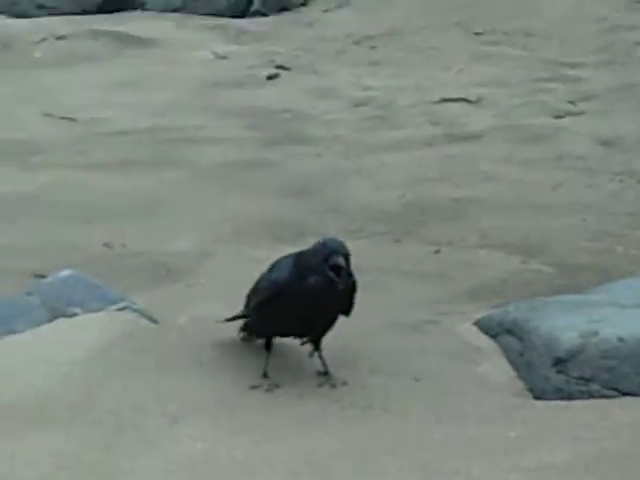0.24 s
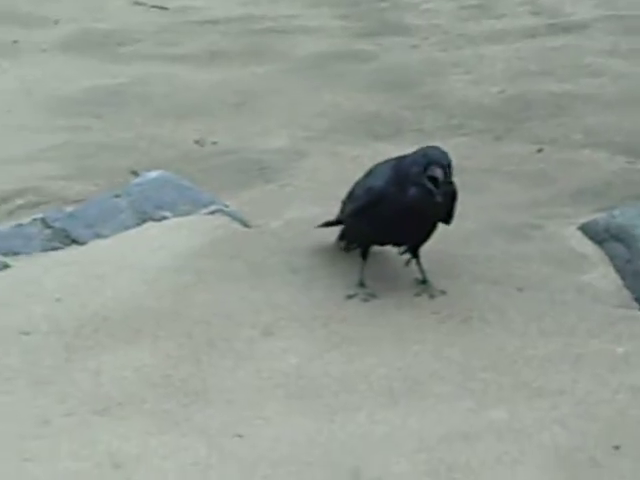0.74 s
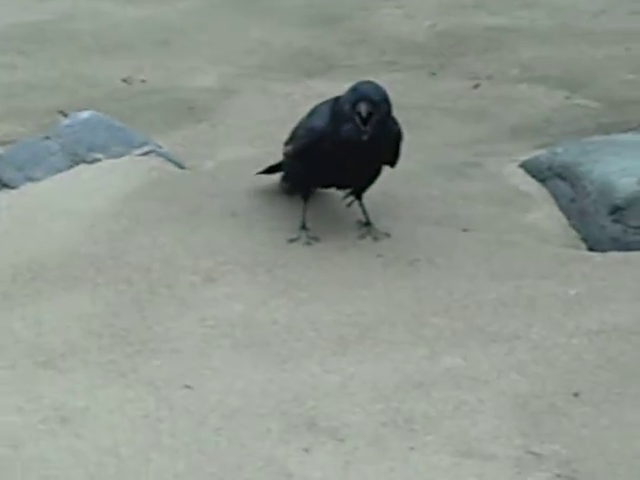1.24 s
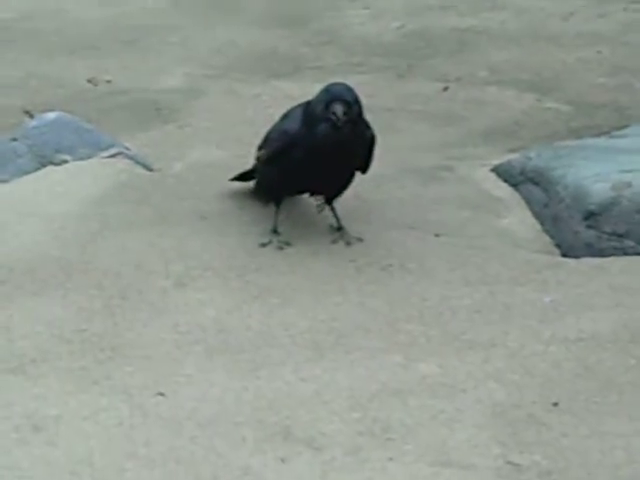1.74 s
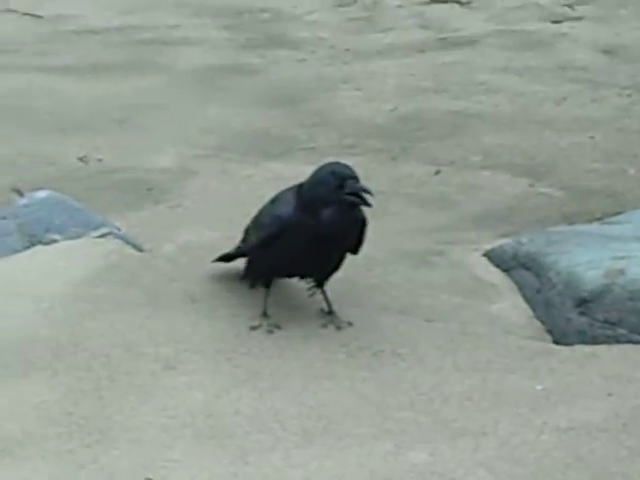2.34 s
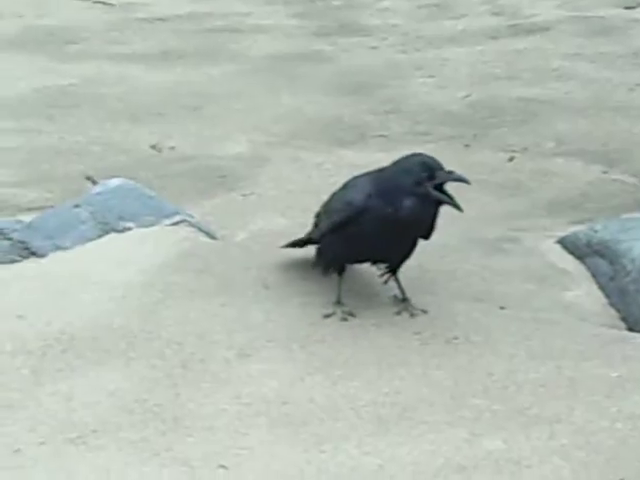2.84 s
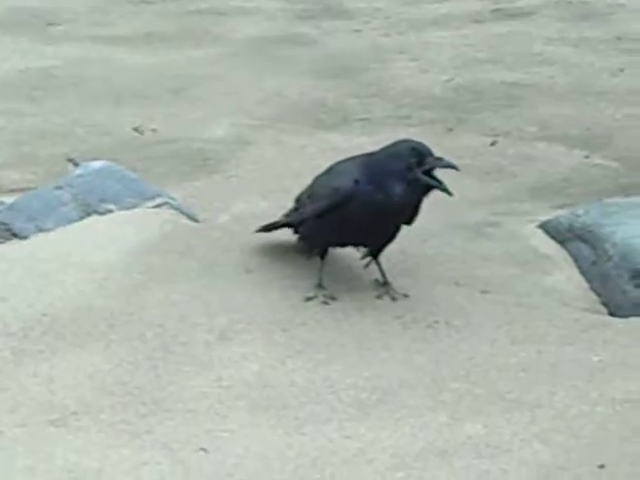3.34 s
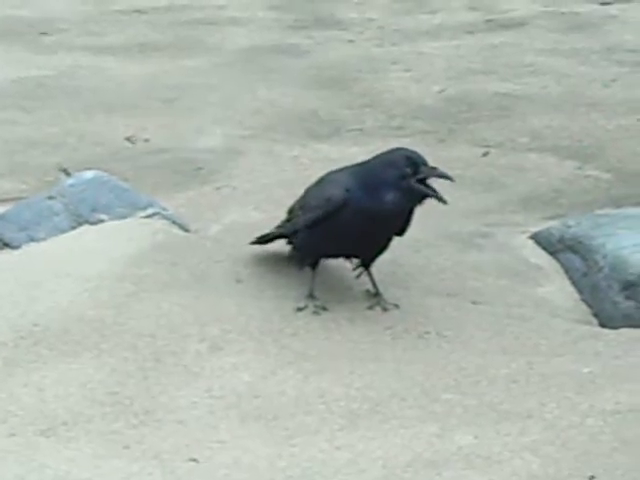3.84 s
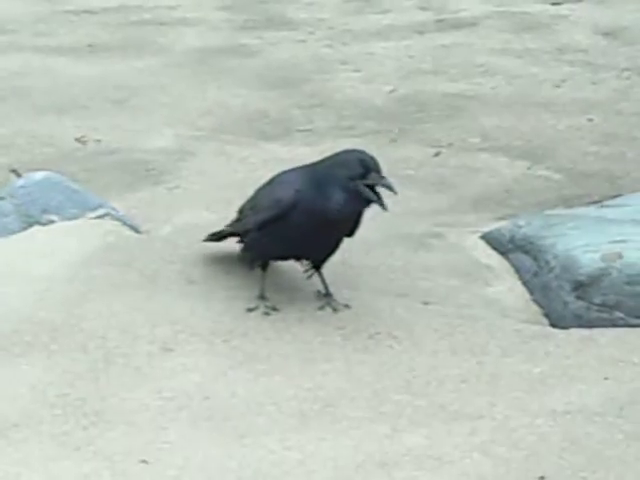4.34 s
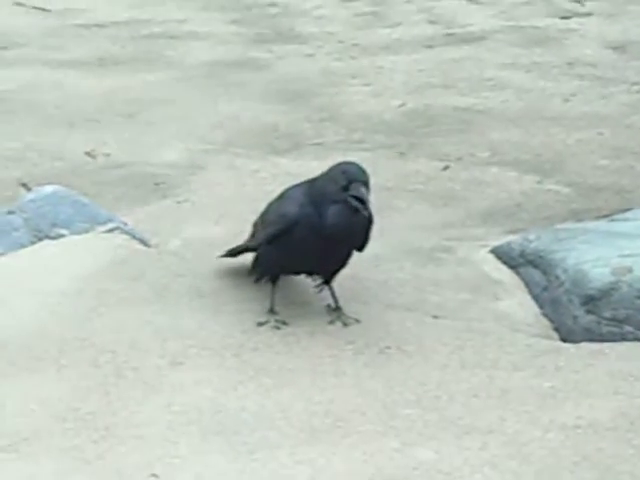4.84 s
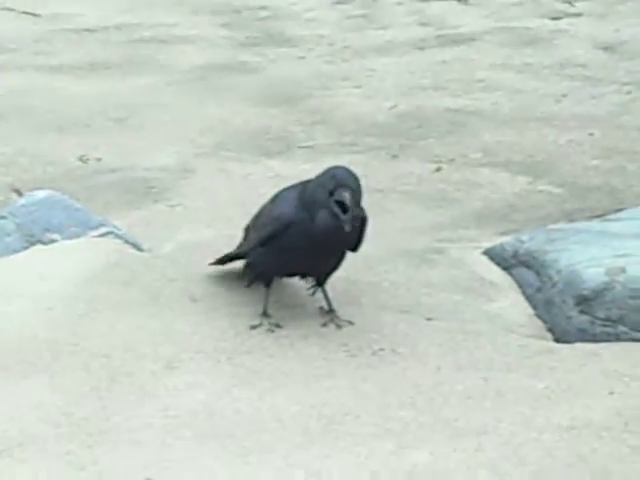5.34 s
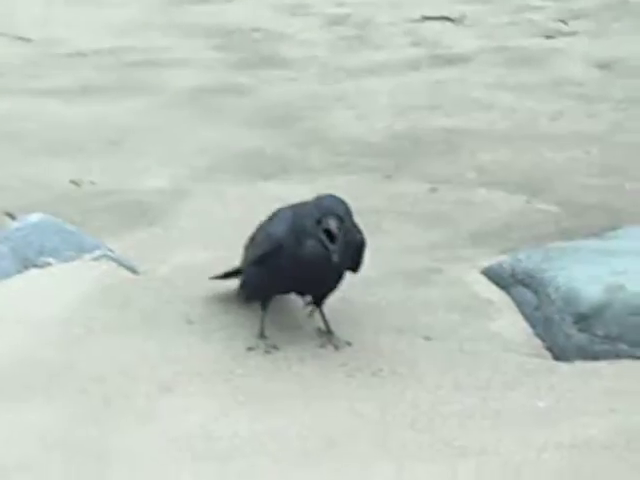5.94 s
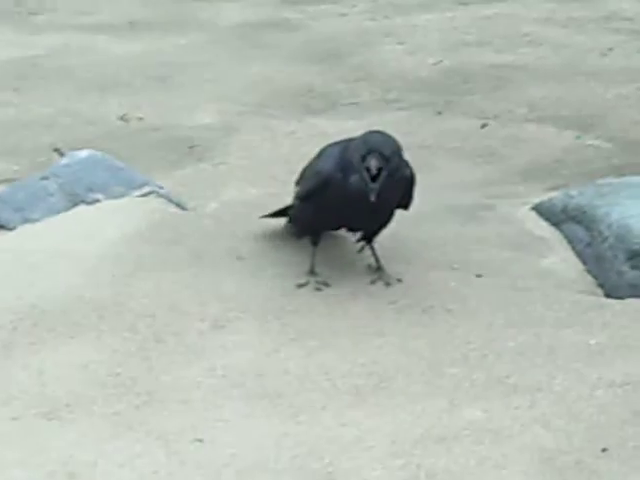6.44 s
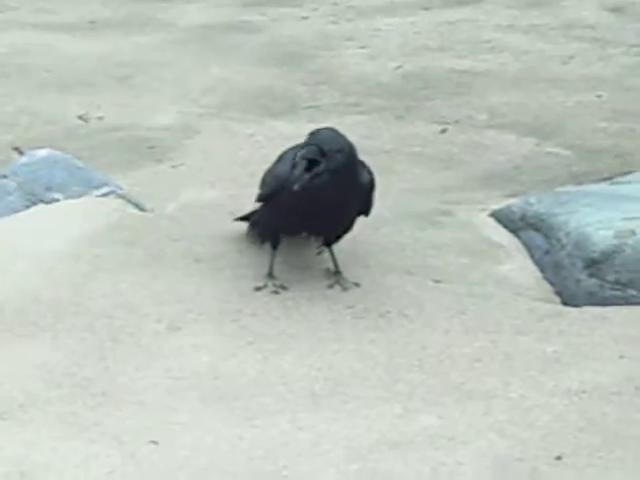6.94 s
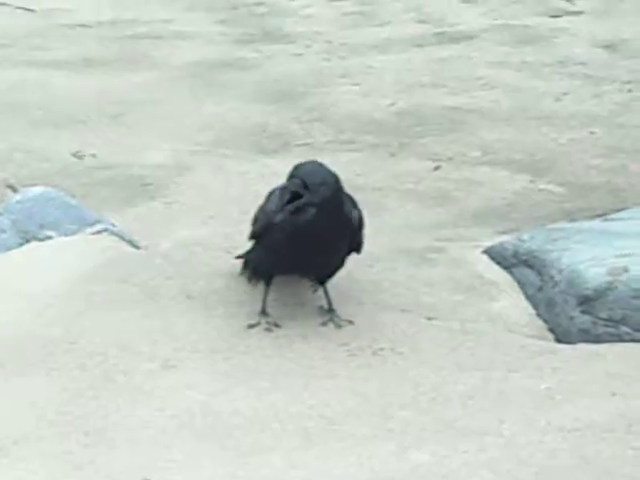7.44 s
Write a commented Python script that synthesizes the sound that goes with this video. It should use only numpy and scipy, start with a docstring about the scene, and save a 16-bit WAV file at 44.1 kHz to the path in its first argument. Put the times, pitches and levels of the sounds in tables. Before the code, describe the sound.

Sixteen hoarse, rattling raven caws, about two a second, ring out over a constant beach wash with low wind thumps on the microphone.

```python
"""A raven on a sandy beach caws sixteen times, close by, over the steady wash of surf.
Each caw opens with a hoarse rasp of noise and breaks into a rattle: about sixty bursts a second of
overtones of a pitch near 500 Hz, ringing in the resonances of throat and beak.
The surf is shaped noise; gusts swell a low rumble, a buffet and a crackle at the microphone.
A narrow-band recorder clips the loudest peaks."""
import sys
import numpy as np
from scipy import signal
from scipy.fft import rfft, irfft, next_fast_len
from scipy.io import wavfile

SR = 44100
rng = np.random.default_rng(int(sys.argv[2]) if len(sys.argv) > 2 else 0)


def log_audio(samples):
    """Write samples as a 16-bit WAV file to the path given in sys.argv[1]."""
    # one column per channel
    frames = np.atleast_2d(samples).T
    # limit to full scale, then quantise
    limited = np.clip(frames, -1, 1)
    pcm = np.round(limited * 32767).astype(np.int16)
    wavfile.write(sys.argv[1], SR, pcm)


N = 338247
TIME = np.arange(N) / SR  # s

# Runs of rattle, one to a caw, though the two hoarsest caws break into several.
# Each row: first burst in seconds, last burst in seconds, number of bursts, slowing 0-1, effort in dB,
# extra effort of the first burst in dB, of the last burst in dB, top pitch in Hz, end pitch in Hz,
# roughness 0-1, nominal open share of the period 0-1, second resonance in dB, upper resonances in dB,
# length of the rasp before it in seconds, relative rasp level in dB.
RATTLE_RUNS = [ (.003, 0.077, 5, .09, 0, -0.5, -5, 528, 465, 0.22, 0.62, 1, -2, 0.018, -6),
               (0.353, .399, 4, 0.02, -2, 0, -1, 490, 480, 0.94, 0.3, -1.5, -1.5, 0.1, -15.5),
               (.431, .528, 6, 0.09, -2, 1, -5, 486.3, 469.3, .72, .28, -4, -0.5, .03, -24),
               (.871, 1.023, 10, .15, -1.5, -4, 0, 508, 469.8, 0.32, .58, -0.5, -1.5, 0.088, -10.5),
               (1.351, 1.474, 8, 0.26, -.5, -3.5, -3, 535.4, 455.5, .08, 0.67, 1, .5, 0.083, -12),
               (1.921, 2.102, 12, 0.2, -1.5, -3, -3, 513, 449.5, 0.3, 0.51, -1.5, -0.5, 0.045, -9),
               (2.498, 2.617, 9, 0.19, -1, -4, -3.5, 520, 490.5, 0.33, 0.71, -1, -2.5, .085, -8.5),
               (2.921, 3.055, 9, 0.11, -1, -5, -7, 512.3, 462.6, 0.18, .62, 0.5, -0.5, 0.088, -7),
               (3.298, 3.314, 2, 0.05, -2, 0, -1, 488, 475, .6, .34, -3.5, -3.5, 0.051, -12),
               (3.342, 3.419, 6, 0.12, -1, -1, -0.5, 487, 470, 0.66, 0.13, -4.5, -1.5, 0.024, -13),
               (3.453, 3.482, 3, 0.06, -3, -2, 0.5, 479, 462, .7, .28, -3.5, -2.5, 0.031, -14.5),
               (3.88, 4.025, 9, 0.1, -3, 2, -3, 498, 467.9, 0.31, 0.62, -2, -2.5, 0.06, -8),
               (4.429, 4.568, 9, .18, -1, -5, -4.5, 513, 438.4, 0.18, 0.59, 0, 0.5, 0.064, -15),
               (5.017, 5.2, 12, .16, -.5, -4, -6, 518.2, 440.2, .08, .6, 0, 2, 0.061, -12),
               (5.543, 5.666, 9, .1, -.5, -2.5, 0, 558, 512, 0.21, 0.66, 1, -1, 0.054, -11.5),
               (5.990, 6.153, 11, .11, -2, -2, -3, 500, 438.8, .45, .48, 0.5, 2, 0.072, -9),
               (6.429, 6.550, 8, .11, -1.5, -4, 0, 499.6, 420, .12, .6, 1.5, 3.5, 0.073, -9),
               (6.841, 6.998, 10, 0.16, -1.5, -2.5, -1.5, 526, 450, 0.31, 0.56, -0.5, -2.5, 0.054, -13.5),
               (7.459, 7.538, 6, .12, -2, -0.5, 0, 506, 431, 0.33, 0.62, 1.5, -3, 0.084, -7)]
# Lone throat clicks ahead of a run. Each row: start in seconds, relative level in dB.
THROAT_CLICKS = [(0.285, -5), (0.859, -5), (1.286, -8), (2.411, -4.5), (3.250, -16), (3.270, -12),
                 (4.361, -3), (4.373, -13), (4.946, -14), (5.945, -4), (6.356, -17)]
# Resonances of throat and open beak. Each row: centre in Hz, width in Hz, level in dB.
THROAT_RESONANCES = [(1408, 260, 4), (1930, 382, -0.5), (2930, 610, -4.5), (4045, 66, -1)]
# Overtones of the syrinx. Each row: multiple of the pitch, level in dB.
SYRINX_OVERTONES = [(3, 1), (4, 4.5), (5, 1), (6, -2), (7, -2.5), (8, 2.5)]
# Spectrum of the surf. Each row: frequency in Hz, relative density in dB.
SURF_SPECTRUM = [(15, -54), (25, -33.5), (65, -16.5), (103, -8.5), (178, -2), (216, -2), (374, 0.5),
                 (471, 0.5), (513, -1), (870, -0.5), (2610, -5.5), (3580, -4.5), (3900, -3.5), (5070, -28),
                 (8580, -120)]
# Slow swell of the surf. Each row: time in seconds, relative level in dB.
SURF_SWELL = [(0.0, -28.5), (0.13, -27), (1.39, -25), (2.22, -26.5), (2.43, -27), (3.16, -28.5),
              (3.44, -25.5), (3.54, -29), (4.14, -29.5), (4.91, -28), (5.11, -27), (6.81, -26.5),
              (6.94, -26.5), (7.28, -28), (7.67, -25)]
# Spectrum of the low wind rumble. Each row: frequency in Hz, relative density in dB.
RUMBLE_SPECTRUM = [(12, -4), (34, -1), (70, -5), (140, -9), (300, -19.5), (700, -58), (2000, -91)]
# Spectrum of the wind buffets. Each row: frequency in Hz, relative density in dB.
BUFFET_SPECTRUM = [(20, -8), (90, -7), (240, 2.5), (400, -3.5), (750, -11), (1300, -32), (3000, -73)]
# Spectrum of the crackle in hard buffets. Each row: frequency in Hz, relative density in dB.
CRACKLE_SPECTRUM = [(150, -30), (450, 12), (900, -12.5), (1400, -25), (3000, -37)]
# Gusts at the microphone. Each row: centre in seconds, Gaussian spread in seconds,
# low rumble in dB, buffet in dB.
WIND_GUSTS = [(0.05, 0.022, -22, -20.5), (0.467, 0.04, -38, -45), (1.58, 0.042, -26.5, -23.5),
              (1.635, .007, -25.5, -15.5), (1.681, 0.023, -19.5, -17.5), (1.771, 0.0047, -16, -12),
              (1.843, 0.0084, -25.5, -14), (1.984, 0.0097, -19.5, -25), (2.126, .0045, -22.5, -22),
              (2.173, .013, -20, -25), (2.88, 0.035, -27, -38), (4.12, 0.019, -26, -34),
              (4.533, 0.017, -20.5, -20), (4.589, 0.0048, -32, -16.5), (4.615, 0.014, -19, -15),
              (5.058, 0.016, -23, -21.5), (5.626, 0.013, -25, -32), (6.06, .035, -21, -30),
              (6.419, 0.051, -27, -34), (6.94, 0.029, -22, -22.5), (7.036, .022, -11.5, -14.5),
              (7.095, 0.015, -21, -13), (7.496, 0.016, -10, -15.5), (7.66, .015, -23.5, -38)]

# Steady breeze and chance wander; a gust's rumble spreads wider than its buffet
BREEZE_DB, BREEZE_WAVER_DB, SURF_WAVER_DB, LINGER_S = -36.5, 3.5, .7, .024
# A run starts near the resting pitch, drawn this share of the way to its top
REST_HZ, START_SHARE = 475, .38
# Effort settles from that of the first burst with this time constant
BUILD_S = .016
# Time constants of the opening and closing of a burst
OPENING_S, CLOSING_S = .0007, .0008
# A rough burst may break in two: chance factor at full roughness, spread of the break
SPLIT_CHANCE, SPLIT_S = .8, .0012
# The rasp swells up to the rattle; its leak holds past the last burst, then dies away
RASP_SWELL_DB, RASP_HOLD_S, RELEASE_DB_PER_S = 13.5, .012, 546
# The rasp peaks just ahead of the rattle and catches as the syrinx tightens
CATCH_S, CATCH_DB = .0099, 5
# Sample rate of the narrow-band recorder, and edge of the final low-pass
RECORDER_HZ, CUTOFF_HZ = 8000, 16000


def from_db(db):
    """Level to amplitude: every 20 dB is a factor of ten."""
    return 10 ** (np.asarray(db) / 20)


def rms_one(x):
    """Normalization: scale to unit mean power."""
    return x / np.sqrt(np.mean(x ** 2) + 1e-20)


def in_time(rows):
    """Linear interpolation: join the points of a curve by straight lines."""
    s, value = np.transpose(rows)
    return np.interp(TIME, s, value)


def bump(s, length):
    """Gaussian envelope: a smooth rise and fall around a moment."""
    squared_distance = ((TIME - s) / length) ** 2
    return np.exp(-.5 * np.minimum(squared_distance, 100))


def coloured_noise(spectrum):
    """Spectral shaping: white noise weighted over log frequency, then set to unit power."""
    hz, db = np.transpose(spectrum)
    size = next_fast_len(N)
    bins = np.maximum(np.arange(size // 2 + 1) * SR / size, 1)
    gain = from_db(np.interp(np.log(bins), np.log(hz), db))
    white = rfft(rng.standard_normal(size))
    return rms_one(irfft(white * gain, size)[:N])


def drift(rate_hz):
    """Low-passed noise: a smooth random wander of unit spread."""
    lowpass = signal.butter(2, rate_hz, fs=SR, output="sos")
    return rms_one(signal.sosfilt(lowpass, rng.standard_normal(N)))


def surf(level_db=2.5):
    """Broadband noise of many breakers: distant waves blend into an even, slowly swelling wash."""
    level = in_time(SURF_SWELL) + level_db + SURF_WAVER_DB * drift(2.3)
    return from_db(level) * coloured_noise(SURF_SPECTRUM)


def wind(lumpy_db=1.0, splutter_db=2.5, crackle_db=2.5):
    """Turbulent pressure: gusts add power to a lumpy rumble; buffets reach higher, the hardest crackle."""
    breeze = from_db(BREEZE_DB + BREEZE_WAVER_DB * drift(3.1))
    gust_power = sum((from_db(db) * bump(s, length + LINGER_S)) ** 2 for s, length, db, _ in WIND_GUSTS)
    rumble_level = np.sqrt(breeze ** 2 + gust_power) * from_db(lumpy_db * drift(26))
    rumble = rumble_level * coloured_noise(RUMBLE_SPECTRUM)

    buffets = sum(from_db(db) * bump(s, length) for s, length, _, db in WIND_GUSTS)
    buffets = buffets * from_db(splutter_db * drift(70))
    # small eddies grow with the square of the buffet
    crackle = from_db(crackle_db) * buffets ** 2 * coloured_noise(CRACKLE_SPECTRUM)
    return rumble + buffets * coloured_noise(BUFFET_SPECTRUM) + crackle


def beach(x, scatter_db=-19.5, t60=0.012):
    """Diffuse scattering: sand and rocks return a faint, short, decaying tail."""
    age = np.arange(SR // 6) / SR
    # the first return comes after 4 ms
    tail = rng.standard_normal(len(age)) * from_db(-60 * age / t60) * (age > .004)
    scattered = signal.fftconvolve(x, tail / np.linalg.norm(tail))[:N]
    return x + from_db(scatter_db) * scattered


def throat(x, gains=(1, 1, 1, 1)):
    """Resonance: parallel two-pole modes of alternating sign in a throat and beak that radiate no bass."""
    out = 0
    for k, ((hz, width, db), gain) in enumerate(zip(THROAT_RESONANCES, gains)):
        r = np.exp(-np.pi * width / SR)
        poles = [1, -2 * r * np.cos(2 * np.pi * hz / SR), r * r]
        ring = signal.lfilter([1, 0, -1], poles, x) * (1 - r * r) / 2
        out = out + (-1) ** k * from_db(db) * gain * ring
    highpass = signal.butter(4, 1150, "high", fs=SR, output="sos")
    return signal.sosfilt(highpass, out)


def through_throat(source, envelope, gains=(1, 1, 1, 1)):
    """Source and filter: a steady source, levelled by its power at the beak, is gated and then rings."""
    return throat(source * envelope, gains) / np.std(throat(source))


def rasp(level_db=-5.0, between_db=-19.0, flutter_db=1.23, second_db=-4.0, flap_hz=80.8, flap_db=3.0):
    """Flow modulation: loose membranes flap unevenly in a swelling airflow; a leak lasts through the rattle."""
    lead, leak = np.zeros((2, N))
    for first, last, *_, rasp_s, rasp_db in RATTLE_RUNS:
        before = (TIME > first - rasp_s) & (TIME <= first)
        ahead = first - TIME[before]
        catch_db = CATCH_DB * np.maximum(1 - ahead / CATCH_S, 0)
        lead[before] = from_db(rasp_db - RASP_SWELL_DB * (ahead / rasp_s) ** 2 - catch_db)

        during = (TIME > first) & (TIME < last + .1)
        dying_s = np.maximum(TIME[during] - last - RASP_HOLD_S, 0)
        leak[during] = from_db(between_db - RELEASE_DB_PER_S * dying_s)
    # each flap starts sharply and fades until the next
    cycle = np.cumsum(flap_hz * (1 + 0.37 * drift(50))) / SR % 1
    flapping_lead = lead * from_db(level_db + flap_db * (.5 - cycle))
    envelope = np.maximum(flapping_lead, leak) * from_db(flutter_db * drift(140))
    # one-pole smoothing darkens the airflow noise
    air = signal.lfilter([1], [1, -.6], rng.standard_normal(N))
    return through_throat(air, envelope, (1, from_db(second_db), 1, 1))


def pitch_arch(along, top_hz, end_hz, flatness=2.5):
    """Power-law arch: the pitch of a run climbs from near rest, over a flat top, down to its end."""
    climb_hz = (1 - START_SHARE) * (top_hz - REST_HZ)
    rise, fall = np.maximum([climb_hz, top_hz - end_hz], 0) ** (1 / flatness)
    return top_hz - np.abs(fall * along - rise * (1 - along)) ** flatness


def burst_gate(age, length, split, stretch=1.07):
    """Valve action: a burst opens fast, holds and closes; a split one lasts longer and shuts midway."""
    length = length * (stretch if split else 1)
    gate = (1 - np.exp(-age / OPENING_S)) / (1 + np.exp((age - length) / CLOSING_S))
    shut = split * np.exp(-.5 * ((age - length / 2) / SPLIT_S) ** 2)
    return gate * (1 - shut)


def rattle(droop=.06, curl=.045, lengthen=0.386, widen=1.3, crack_s=0.0037, uneven_db=0.4):
    """Relaxation oscillation: the syrinx opens in slowing bursts, longer and louder when pushed harder.

    Returns the gate, onset crack, pitch in Hz, roughness and resonance gains."""
    gate, crack, rough, second, upper = np.zeros((5, N))
    pitch = np.full(N, float(REST_HZ))
    age = np.arange(SR // 25) / SR
    for first, last, bursts, slowing, effort_db, first_db, last_db, *voice, _, _ in RATTLE_RUNS:
        top_hz, end_hz, roughness, open_share, second_db, upper_db = voice
        along = np.linspace(0, 1, bursts)
        onsets = first + (last - first) * (along - slowing * along * (1 - along ** 2))
        starting_db = first_db * np.exp((first - onsets) / BUILD_S)
        pushes = from_db(effort_db + starting_db + last_db * (along == 1))
        pitches = pitch_arch(along, top_hz, end_hz)
        for s, period, hz, push, spent in zip(onsets, np.gradient(onsets), pitches, pushes, along):
            late, strong, long, sharp = rng.standard_normal(4)
            start = max(int((s + .0003 * late) * SR), 0)
            now = slice(start, start + len(age))

            # only the last burst may stay open for its whole period
            widest = 1 if spent == 1 else .75
            share = open_share * (1 + lengthen * (spent - .5)) * push ** widen * (1 + .07 * long)
            length = period * min(share, widest)
            size = from_db(uneven_db * strong) * push
            split = rng.random() < SPLIT_CHANCE * roughness ** 2 and length > .007
            gate[now] += size * burst_gate(age, length, split)
            crack[now] += size * np.exp(-age / crack_s)

            # each burst curls over and droops, ever more steeply as the air runs out
            past_middle = np.minimum(2 * age / period - .7, 1.5)
            curled = curl * np.minimum(2 * age / length - 1, 1) ** 2
            sag = droop * (.3 + spent ** 3) * past_middle + curled
            pitch[now] = hz * (1 + .04 * roughness * sharp - sag)
            rough[now], second[now], upper[now] = roughness, second_db, upper_db
    return gate, crack, pitch, rough, (1, from_db(second), from_db(upper), from_db(upper))


def raven(noise_db=-6.0, crack_db=-4.0, jitter=.06, click_s=0.002):
    """Voiced and turbulent excitation: jittery overtones in cracking bursts, with clicks and a hoarse rasp."""
    gate, crack, pitch, rough, gains = rattle()
    jittery_pitch = pitch * (1 + jitter * rough * drift(387.5))
    phase = 2 * np.pi * np.cumsum(jittery_pitch) / SR
    overtones = sum(from_db(db) * np.cos(k * phase) for k, db in SYRINX_OVERTONES)
    tone = through_throat(overtones, gate * (1 - .5 * rough), gains)

    clicks = sum(from_db(db) * (TIME >= s) * np.exp(-np.abs(TIME - s) / click_s) for s, db in THROAT_CLICKS)
    # differencing brightens the turbulence
    turbulence = signal.lfilter([1, -.7], [1], rng.standard_normal(N))
    noise_envelope = from_db(noise_db) * gate * rough + from_db(crack_db) * crack + clicks
    bark = through_throat(turbulence, noise_envelope, gains)
    return tone + bark + rasp()


def scene():
    """Superposition: the pressures of bird, sea and wind add at one microphone."""
    return (beach(raven()) + surf() + wind())[None]


def record(dry, full_scale=0.66):
    """Band-limiting and clipping: a low-rate converter clips; crests between its samples clip again."""
    steps = SR // np.gcd(SR, RECORDER_HZ)
    steep = signal.firwin(128 * steps + 1, 1 / steps, window=("kaiser", 7))
    smooth = signal.firwin(32 * steps + 1, 1 / steps, window=("kaiser", 9))
    coarse = signal.resample_poly(dry, RECORDER_HZ, SR, axis=1, window=steep)
    coarse = np.clip(coarse, -full_scale, full_scale)
    fine = signal.resample_poly(coarse, SR, RECORDER_HZ, axis=1, window=smooth)[:, :N]
    fine = np.clip(fine, -full_scale, full_scale)
    lowpass = signal.ellip(12, .1, 90, CUTOFF_HZ, fs=SR, output="sos")
    return signal.sosfilt(lowpass, fine)


dry = scene()
out = record(dry)
log_audio(out)
```